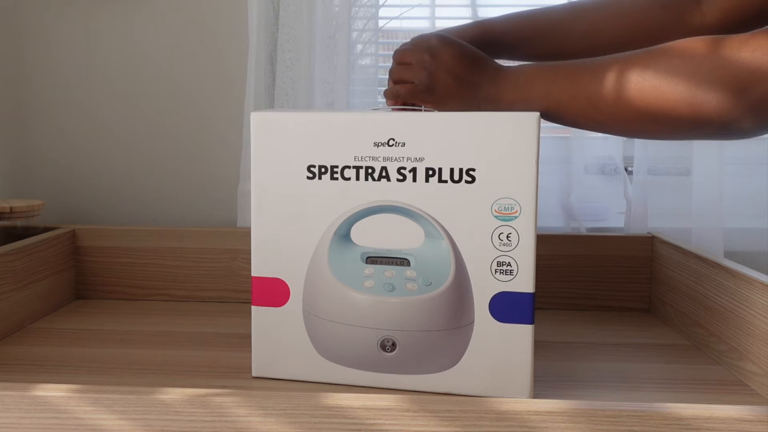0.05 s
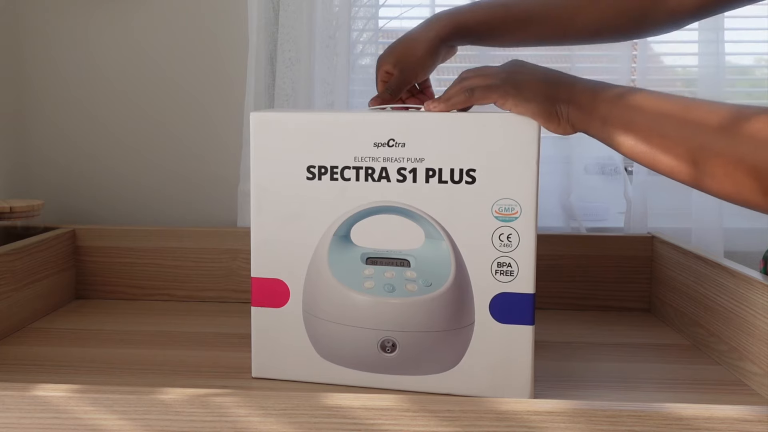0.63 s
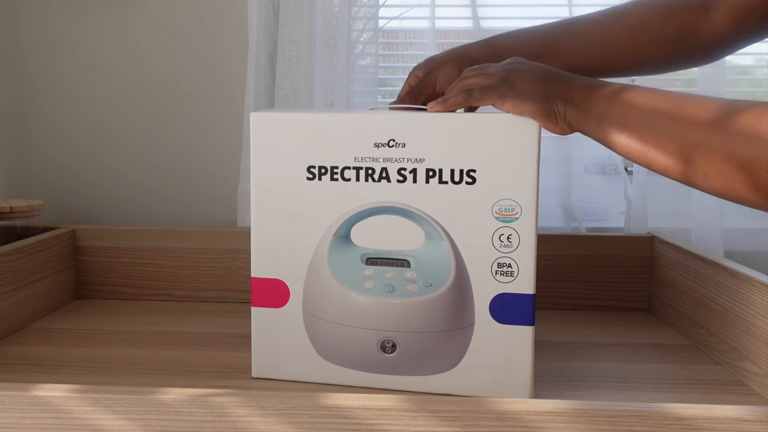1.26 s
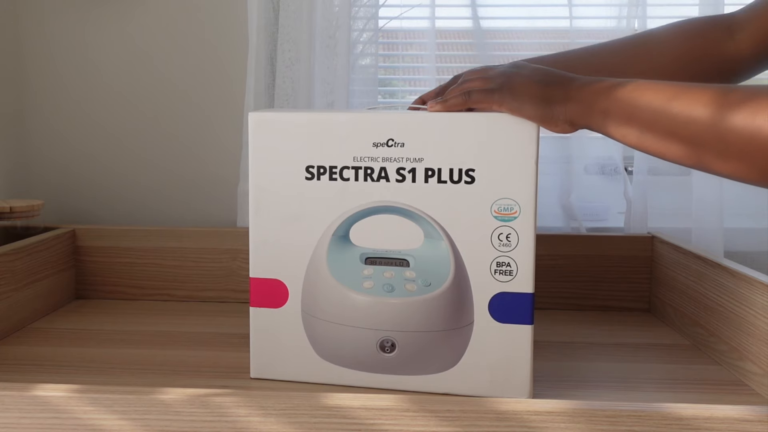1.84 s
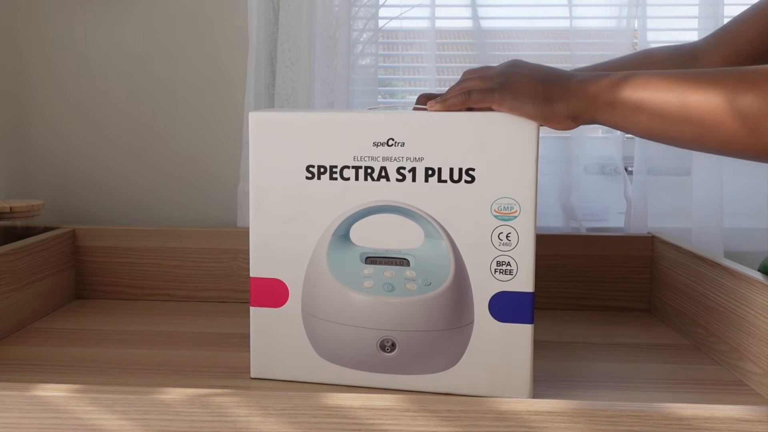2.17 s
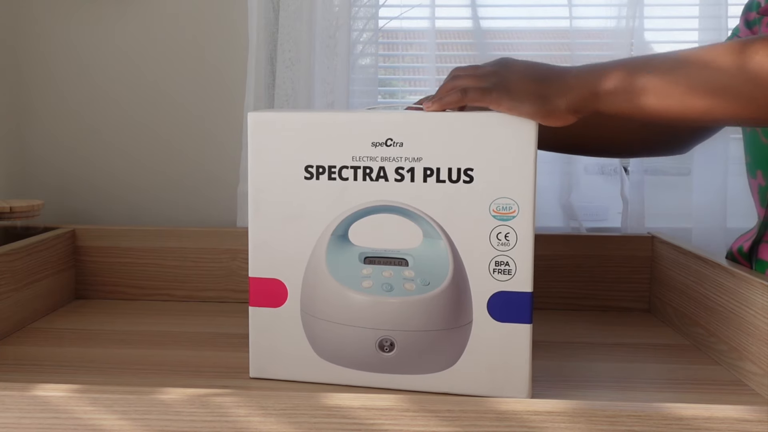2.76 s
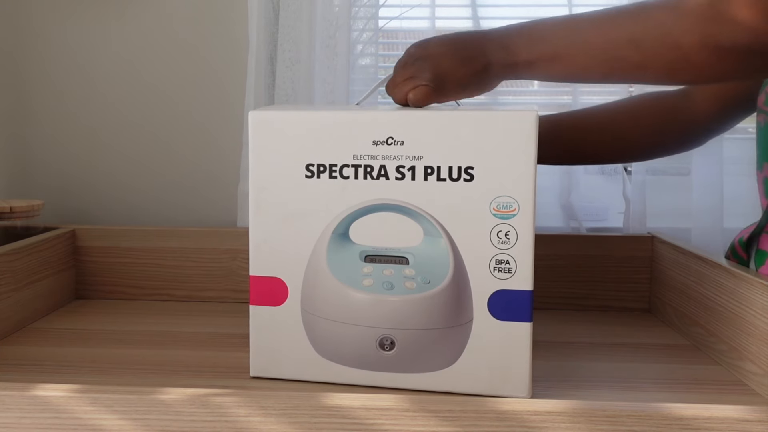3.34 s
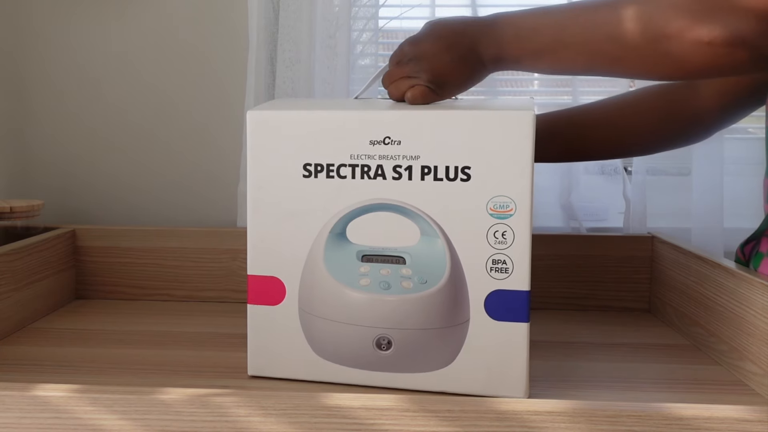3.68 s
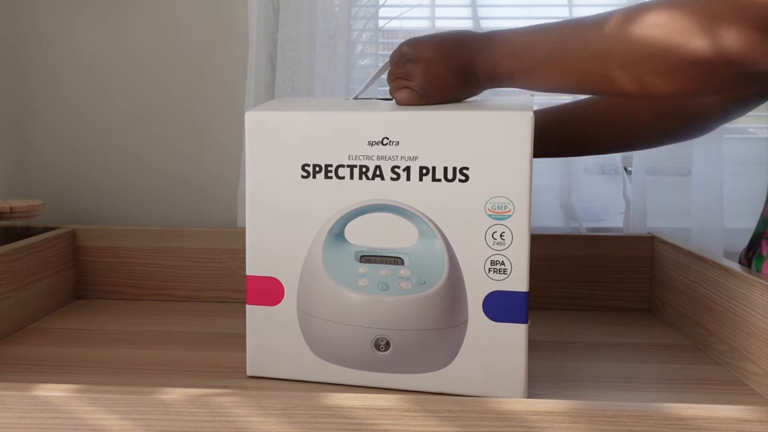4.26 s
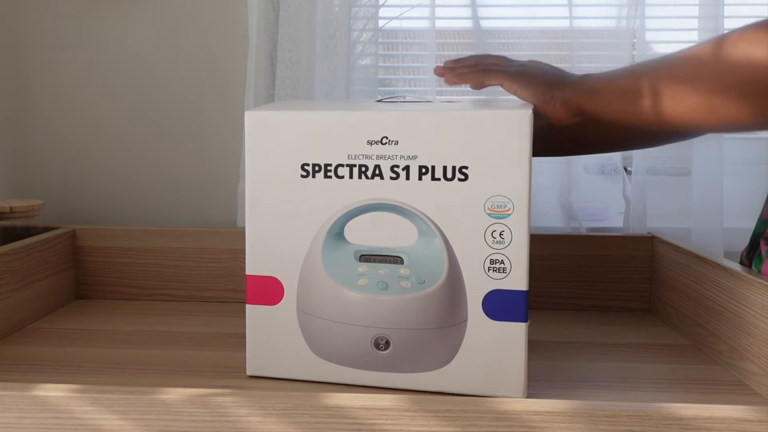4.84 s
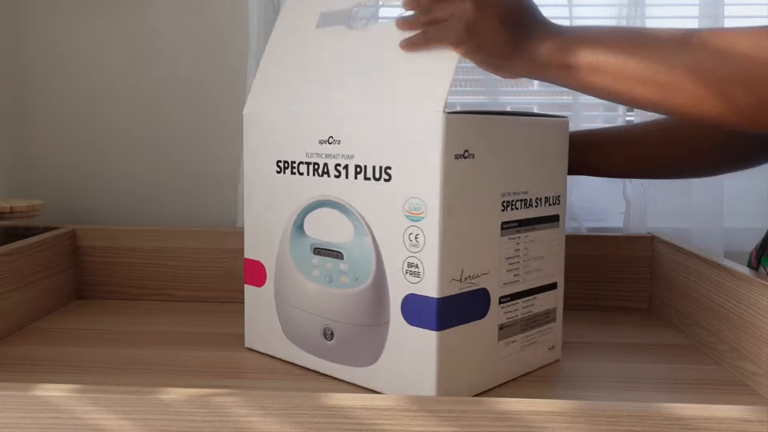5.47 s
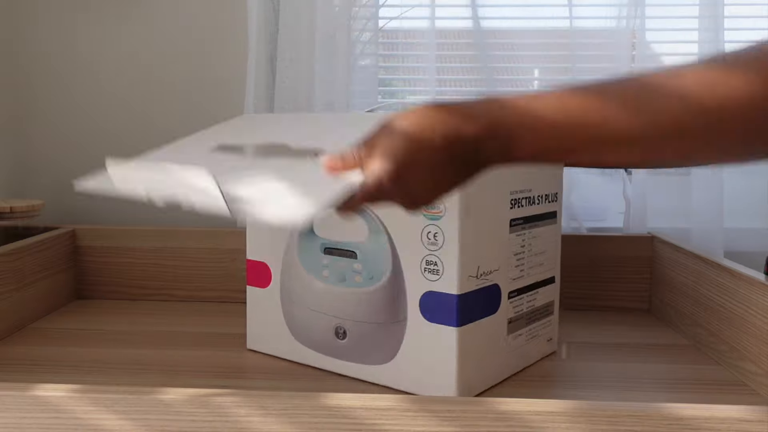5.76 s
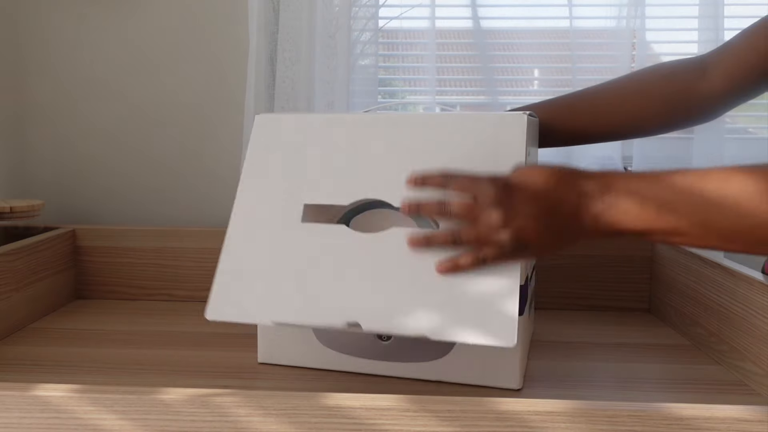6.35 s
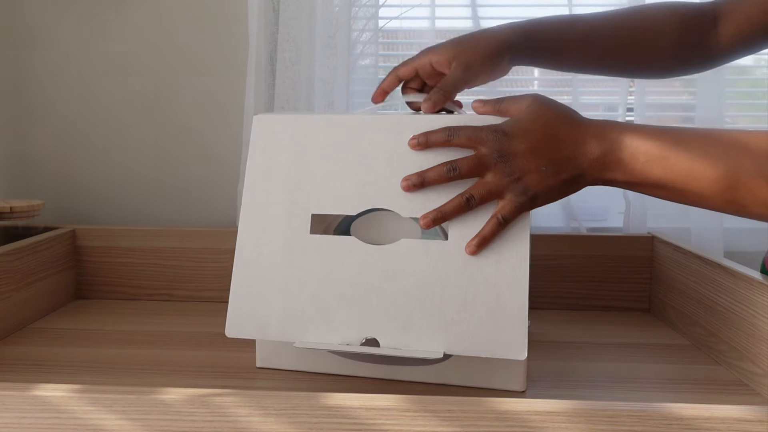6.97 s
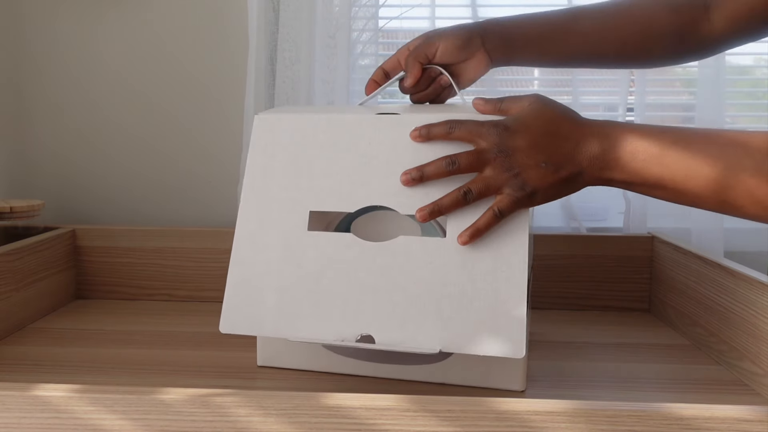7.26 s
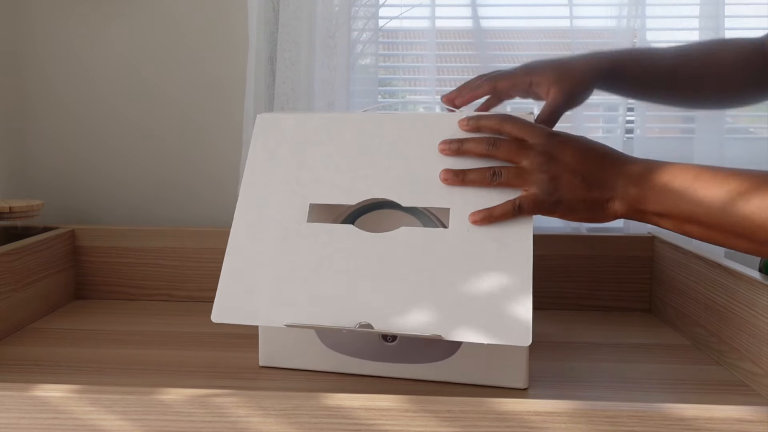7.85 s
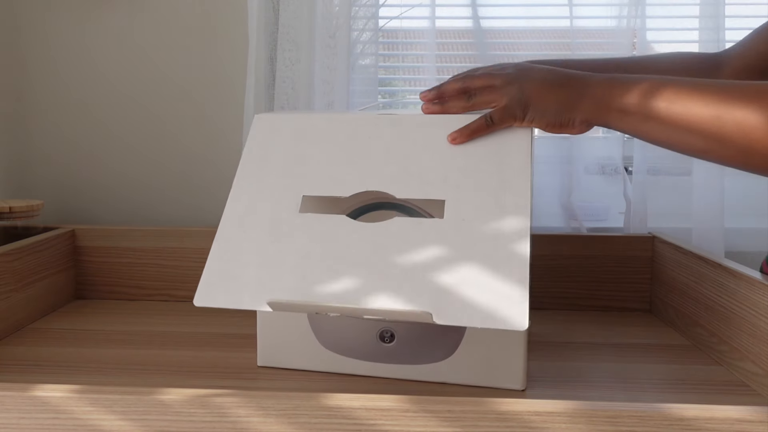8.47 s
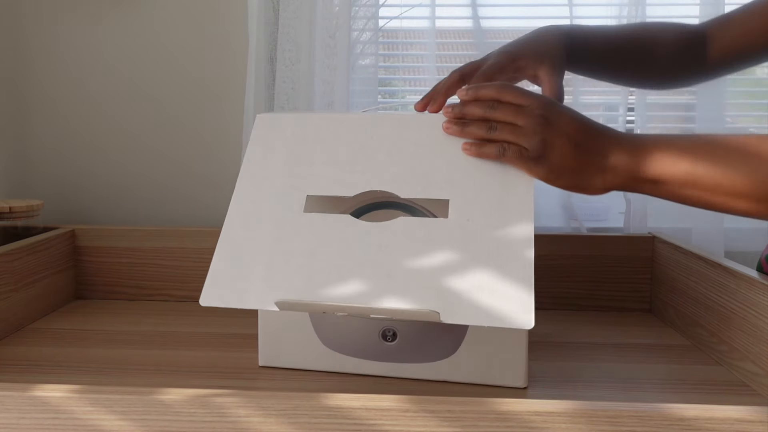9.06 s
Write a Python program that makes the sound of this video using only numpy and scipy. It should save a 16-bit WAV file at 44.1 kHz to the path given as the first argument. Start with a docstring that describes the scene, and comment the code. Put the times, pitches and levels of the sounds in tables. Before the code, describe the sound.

A cardboard box is opened by hand close by, with dry scrapes, sharp cracks, one short squawk and hollow taps.

```python
"""A large cardboard box opened by hand on a wooden table, a metre from a phone in a small quiet room.
Fingers rub and pick at the board, a tight tab sticks and slips out of its slot with a squawk and the
carry handle flicks free; the lid scrapes open, flops over and is patted down. Blows and rubbing ring
the panels and the hollow inside, creases crack, and near walls answer over a faint steady hush."""
import sys
import numpy as np
from scipy import signal
from scipy.fft import rfft, irfft, next_fast_len
from scipy.io import wavfile
from scipy.ndimage import uniform_filter1d

SR = 44100
rng = np.random.default_rng(int(sys.argv[2]) if len(sys.argv) > 2 else 0)


def digitize_waveform(pressure):
    """Quantize a signal to 16-bit integers and store it at the path in sys.argv[1].

    Rows of a 2-D input are taken as channels; values are limited to [-1, 1].
    """
    field = np.atleast_2d(pressure).T
    bounded = np.clip(field, -1, 1)
    quanta = np.round(bounded * 32767).astype(np.int16)
    wavfile.write(sys.argv[1], SR, quanta)


N = 402191
TIME = np.arange(N) / SR

# The modes of the box. Each row: pitch in Hz, relative level in dB, t60 in seconds before added damping.
BOX_MODES = [(203, -6, 0.29), (240, -2.5, 0.3), (285, -3, 0.085), (368, 4, 0.27), (445, -3, 0.1),
             (595, 5.5, 0.15), (690, -4, 0.08), (950, -1, 0.16), (1115, 3.5, 0.13), (1178, 4.5, 0.13),
             (1695, 3, 0.12), (1810, 1, 0.12), (2460, 3, 0.013), (2900, 2, 0.099), (3810, 4.5, 0.24)]


def knocks(crumple=0.93, table_db=-35, body_width_hz=170):
    """Each blow is a scuff, a sharp contact and a crumple of tiny slips while the board settles."""
    # Each row: contact in seconds; levels in dB of hollow body, panels, crack and sizzle of the cut
    # edges; body pitch in Hz; time constants of scuff and settling in seconds.
    blows = [(0.046, -62, -63, -75.5, -84, 316, 0.0062, 0.017),
             (.175, -62, -75, -79, -82, 333, 0.0011, 0.012), (0.426, -65, -83, -90, -105, 209, 0.027, .018),
             (.846, -62, -71, -76, -94, 241, .0037, 0.0082),
             (1.141, -63, -66.5, -59.5, -74, 283, 0.00093, 0.021),
             (1.391, -65.5, -66, -82, -88, 270, .013, .0066),
             (1.494, -63.5, -67.5, -87, -91, 327, .0035, .008),
             (1.751, -64, -64, -75, -77, 260, 0.0034, 0.033),
             (1.825, -68, -64.5, -64.5, -77, 370, 0.0055, 0.0097),
             (2.171, -67, -58.5, -75, -78, 341, 0.0078, 0.018),
             (2.203, -65, -45, -51, -51, 390, 0.0022, 0.043),
             (2.259, -43, -36, -34.5, -59, 300, 0.0044, 0.016),
             (2.319, -28.5, -36, -43.5, -66.5, 250.7, 0.0042, 0.011),
             (2.596, -54.5, -65, -69, -81, 202, 0.0058, 0.045),
             (2.773, -55, -58, -55, -66, 207, 0.0082, 0.057),
             (2.909, -56.5, -59.5, -61, -62, 407, .001, 0.006),
             (3.018, -54, -54, -72, -86, 326, 0.0011, 0.0042),
             (3.136, -54, -59, -84, -86, 298, .0005, 0.005), (3.162, -54, -62, -72, -75, 278, 0.02, 0.0078),
             (3.273, -44, -52, -62, -74, 316, 0.0065, 0.0084),
             (3.286, -38, -47.5, -53, -62.5, 340, 0.0048, 0.026),
             (4.049, -60.5, -69, -69, -81, 310, 0.0012, .011),
             (4.619, -61.5, -82, -90, -102, 343, 0.00045, 0.0098),
             (4.727, -41.5, -42.5, -45.5, -57, 340, 0.0028, 0.021),
             (4.790, -43, -48, -55, -66, 342, .004, .008),
             (4.806, -38.5, -38, -43.5, -65.5, 273, 0.0021, 0.013),
             (4.957, -47, -56, -54, -62.5, 294, 0.023, 0.026),
             (4.977, -41, -44.5, -51.5, -60.5, 290, 0.012, .018),
             (5.22, -42.5, -42.5, -36.5, -49.5, 355, 0.0032, 0.029),
             (5.281, -38, -38.5, -48, -64, 360, 0.0074, 0.022),
             (5.664, -60, -60, -69, -72, 450, 0.014, 0.0051),
             (5.718, -40.5, -39.5, -39.5, -50.5, 357, 0.0093, 0.016),
             (5.77, -52.5, -70, -66, -60, 430, 0.0078, 0.013),
             (6.028, -58.5, -58.5, -52, -63, 267, 0.0087, 0.028),
             (6.249, -58.5, -60, -57, -80, 289, 0.0038, .022),
             (6.371, -59.5, -59, -76, -88, 260, 0.0076, 0.011),
             (6.559, -55, -62, -72, -76, 273, 0.0028, 0.0064),
             (6.594, -53, -65, -58, -75, 299, 0.0036, .016),
             (6.916, -34.5, -42, -50, -64, 245, 0.00055, .015),
             (6.938, -39, -50, -57, -68, 224, .001, 0.0078), (6.985, -45, -50, -61, -72, 330, .002, .009),
             (7.081, -46, -49, -52, -71, 336, 0.029, 0.022),
             (7.2246, -50.5, -46.5, -59, -79, 272, 0.00085, 0.014),
             (7.493, -52, -48, -74, -80, 285, 0.00089, 0.0043),
             (7.579, -57, -57, -72, -78, 328, 0.0013, .006),
             (7.630, -45.5, -56, -63, -80, 268, 0.002, .009),
             (7.679, -47.5, -58, -80, -92, 346, .001, 0.0039),
             (7.745, -34, -36.5, -44.5, -60, 395, 0.0045, 0.022),
             (7.783, -45, -46.5, -53, -68, 410, .002, .01), (7.874, -51, -56, -66, -86, 355, 0.026, 0.01),
             (8.401, -55, -58.5, -73, -72, 316, 0.094, 0.022),
             (8.776, -53.5, -53.5, -53.5, -69, 257, 0.0028, .022),
             (9.016, -47, -49.5, -55, -70, 297, 0.0018, 0.013),
             (9.084, -50, -56, -66, -80, 337, 0.0021, 0.028)]
    edges_hz = [135, 480, 2000, 6000, 14000]  # band edges of body, panels, crack and sizzle
    body_band, *upper_bands = zip(edges_hz, edges_hz[1:])
    centres_hz = np.sqrt(np.prod(upper_bands, axis=1))
    out, lead = np.zeros(N), SR // 10
    t = np.arange(-lead, SR * 3 // 10) / SR
    for s, body_db, *upper_db, body_hz, scuff_s, settle_s in blows:
        pressure = np.exp(-np.abs(t) / np.where(t < 0, scuff_s, settle_s))
        force = slips(len(t), rate=3500, spread_db=2.0) * pressure
        force *= crumple * np.sqrt(settle_s / 0.0056) / np.linalg.norm(force)
        force[lead] += 1  # the sharp contact
        ring = signal.fftconvolve(even(force), box_ring())[:len(t)]
        ring = band(ring, 130, 2700, order=1)  # small panels radiate little bass; board swallows treble
        # a wide panel booms lower and more clearly pitched than a corner
        hollow = resonate(band(ring, *body_band, order=4), body_hz, body_width_hz)
        walls = wall_boom(t, body_hz)
        wall_share = np.clip(.75 * (1 - (body_hz - 235) / 220), 0, .95)
        boom = sum(np.sqrt(share) * x * undb(body_db - attack_db(x, lead))
                   for share, x in [(wall_share, walls), (1 - wall_share, hollow)])
        # a soft palm leaves the panels dull, a stiff edge makes them crack
        gains_db = np.array(upper_db) - [attack_db(band(ring, lo, hi), lead) for lo, hi in upper_bands]
        panels = band(colour(ring, list(zip(centres_hz, gains_db))), 410, 14300, order=2)
        add(out, s + t[0], boom + panels)
    # the table takes up a little of each thump as a low shudder
    thump = np.sqrt(np.abs(uniform_filter1d(band(out, 99.6, 370) ** 2, SR // 50)))
    shudder = unit(band(rng.standard_normal(N), 25.3, 120, order=2))
    return out + undb(table_db) * thump * shudder


def box_ring(panel_t60=0.033, panel_db=3, spot_db=3, hand_t60=0.8, loss_hz=400):
    """The box struck at a random spot: modes shifted and damped by the grip, over a dense panel ring."""
    t = np.arange(SR // 4) / SR
    hz, db, t60 = np.transpose(BOX_MODES)[:, :, None]
    spot, grip, side = rng.standard_normal((3, len(BOX_MODES), 1))
    hz = hz * (1 + .015 * grip)
    damping = 1 / t60 + (1 + hz / loss_hz) / hand_t60  # the board damps high modes fastest
    fade = np.exp(-np.log(1000) * t * damping)
    modes = np.sign(side) * undb(db + spot_db * spot) * np.sin(2 * np.pi * hz * t) * fade
    panels = even(rng.standard_normal(len(t)) * np.exp(-np.log(1000) * t / panel_t60))
    return modes.mean(0) + undb(panel_db) * panels


def wall_boom(t, hz, wall_t60=0.12, wall_hz=240, swell_s=0.0032, pair_db=-9, bend=.14, bend_s=.025):
    """Two broad walls flex against the air inside: close low modes that sag as the board relaxes."""
    t = np.maximum(t, 0)
    detune, phase = rng.standard_normal(2)
    angle = 2 * np.pi * hz * (t + bend * (bend_s * (1 - np.exp(-t / bend_s)) - t / 2))
    pair_ratio = .85 * (1 + .03 * detune)
    pair = np.sin(angle) + undb(pair_db) * np.sin(pair_ratio * angle + phase)
    swell = 1 - np.exp(-t / swell_s)
    fade = np.exp(-np.log(1000) * t / wall_t60 * (hz / wall_hz) ** 2)  # higher pairs die sooner
    return band(pair * swell * fade, 135, 1200, order=2)


def tab_squawk(tearing=.55, direct=0.067, tab_db=-2, jitter=.05):
    """The tab sticks and slips in a rising squawk that drops as it lets go; its flap colours it."""
    # The pull out of the slot. Each row: time in seconds, slips per second, relative level in dB.
    tab_pull = [(2.218, 760, -65), (2.227, 810, -29.5), (2.234, 860, -21.5), (2.24, 910, -19),
                (2.249, 950, -17.5), (2.253, 750, -24.5), (2.262, 570, -32.5), (2.275, 1050, -67)]
    # Resonances of tab and flap. Each row: centre in Hz, width in Hz, relative gain in dB.
    flap_modes = [(710, 44, -8), (960, 200, 1.5), (1110, 61, -1), (1505, 90, 2), (1740, 260, -5.5),
                  (2260, 110, -7), (2600, 92, 4.5), (2930, 100, -8), (3500, 260, -9.5), (4260, 400, -18),
                  (5640, 500, -18)]
    rate, db = curves(tab_pull)
    wobble = jitter * unit(uniform_filter1d(rng.standard_normal(N), SR // 700))
    slip_count = np.floor(np.cumsum(rate * (1 + wobble)) / SR)
    pulses = np.diff(slip_count, prepend=0)
    pull = undb(db) * ((TIME > tab_pull[0][0]) & (TIME < tab_pull[-1][0]))
    drive = (unit(pulses) + tearing * slips(N, rate=5200, spread_db=-3)) * pull
    flap = sum(undb(gain_db) * resonate(drive, hz, width) for hz, width, gain_db in flap_modes)
    squawk = unit(band(direct * drive + flap, 480, 4600))
    return squawk * np.sqrt(np.mean(pull ** 2)) * undb(tab_db)


def snaps(snap_t60=0.022, low_hz=600, soft_hz=4000):
    """A crease gives way or a nail catches an edge: one dry crack, too brief to ring the box."""
    # Each row: start in seconds, attack level in dB, treble cutoff in Hz.
    cracks = [(.177, -63, 14000), (1.141, -56, 9000), (2.3135, -35, 14000), (2.3235, -31.5, 11000),
              (2.329, -32.5, 12000), (2.802, -43.5, 11000), (4.797, -47.5, 6000), (4.807, -43, 4270),
              (5.2195, -42, 13900), (5.2815, -35, 3500), (5.292, -40, 3200), (5.718, -33, 13000),
              (5.7255, -34, 12000), (6.558, -51, 3000), (6.5675, -50, 2600), (6.594, -49, 5030),
              (6.916, -57, 14000), (7.079, -43.5, 14000), (7.093, -43, 13000), (7.225, -46, 2970),
              (7.494, -46, 1780), (8.776, -50.5, 5000)]
    out, t = np.zeros(N), np.arange(SR // 20) / SR
    for s, db, top_hz in cracks:
        burst = even(rng.standard_normal(len(t)) * np.exp(-np.log(1000) * t / snap_t60))
        softened = band(burst, low_hz, soft_hz, order=1)
        crack = band(softened, 250, top_hz, order=4)
        add(out, s, undb(db) * crack / np.std(crack[:SR // 300]))
    return out


def rubbing(judder_db=0.5, ring_db=-6.5, grit_db=-13, fumble_db=3, waver_db=1, shift_db=4, scrape_db=-1):
    """Skin and card slide in uneven steps; dense slips and coarse catches hiss and ring the box."""
    # The tone of sliding card. Each row: frequency in Hz, relative level in dB.
    spectrum = [(60, -2.5), (130, -11.5), (250, -1), (600, -7.5), (1400, -5), (2200, -3), (3700, -3.5),
                (5500, -9.5), (8500, -12.5), (15500, -22)]
    edges_hz = [100, 500, 5000, 15500]  # band edges of rumble, scrape and hiss
    fibres = slips(N, rate=14000, spread_db=-0.7)
    grit = slips(N, rate=160, spread_db=0.5)
    friction = (fibres + undb(grit_db) * grit) * undb(judder_db * walk(70) + waver_db * walk(14))
    # the modes come and go as the contact moves
    ringing = sum(undb(db + shift_db * walk(9)) * resonate(friction, hz, 9 / t60)
                  for hz, db, t60 in BOX_MODES)
    sound = colour(friction + undb(ring_db) * ringing, spectrum)
    rumble, scrape, hiss = stroke_levels()
    levels = [rumble * undb(fumble_db * walk(35)), scrape * undb(scrape_db), hiss]
    return sum(gain * unit(band(sound, lo, hi)) for gain, lo, hi in zip(levels, edges_hz, edges_hz[1:]))


def stroke_levels(release_s=0.047, sag_db_per_s=9):
    """Gains of rumble, scrape and hiss: each stroke gathers speed, slows a little and dies away."""
    # Fingers and flaps sliding over the board. Each row: start, length and rise in seconds,
    # scrape level in dB, then rumble and hiss in dB over the scrape.
    strokes = [(0.064, 0.044, 0.022, -85, 20.5, -15), (0.168, 0.11, .008, -76.5, -3, 7),
               (0.352, 0.2, 0.083, -65.5, -2, -2.5), (0.565, 0.11, 0.023, -69, -1.5, -2),
               (0.713, 0.22, 0.022, -73, 2, -8), (1.115, 0.15, 0.014, -76.5, 8, 2.5),
               (1.345, 0.052, 0.028, -64.5, -12, -6), (1.506, 0.077, 0.045, -69, 2, 0.5),
               (1.755, 0.087, .03, -75, -6, -3), (2.148, 0.051, 0.025, -61, -18, -1),
               (2.196, 0.057, 0.023, -40, -10.5, -5.5), (2.317, 0.0054, .004, -48.5, 2, 4.5),
               (2.46, 0.21, 0.083, -65, -15, -4), (2.598, 0.11, 0.03, -58, -6.5, -6),
               (2.787, 0.14, 0.015, -57, -4, 0.5), (2.947, 0.12, 0.023, -66.5, 1.5, -1),
               (3.172, 0.24, 0.027, -61.5, -1, -3), (3.422, 0.061, 0.06, -53.5, -17, -6),
               (3.522, 0.13, 0.018, -66, -9.5, -15), (3.67, 0.21, 0.22, -63, -2, -13),
               (3.89, .025, 0.016, -58.5, -7, -2), (3.948, 0.033, 0.023, -61.5, -1, -4),
               (4.058, 0.065, 0.053, -57.5, -2, -0.5), (4.164, 0.18, 0.028, -65.5, -4.5, -15),
               (4.546, 0.27, 0.017, -64, -11.5, -4.5), (4.66, 0.32, 0.068, -55.5, 0.5, -10.5),
               (4.923, 0.075, 0.039, -50, -9, -11), (5.105, 0.21, 0.17, -46.5, -9.5, -8.5),
               (5.333, .20, 0.079, -46.5, -15, -4), (5.592, 0.25, 0.12, -51.5, -10.5, -7),
               (5.845, 0.24, 0.078, -54.5, -13, -4.5), (6.094, 0.21, 0.032, -55, -10, -10.5),
               (6.371, 0.033, 0.041, -53, -10.5, -5.5), (6.42, 0.28, 0.035, -56.5, -7.5, -4),
               (6.922, 0.14, 0.029, -56, 5.5, -4), (7.076, 0.023, 0.014, -51, -11, -3),
               (7.189, 0.22, 0.21, -60.5, -9, -7.5), (7.473, 0.15, 0.07, -53, -1.5, -4),
               (7.63, 0.13, 0.016, -57.5, -16, -3.5), (7.78, 0.33, 0.019, -64, -8, -1),
               (8.034, 0.047, 0.045, -47.5, -6, -6), (8.12, 0.029, 0.055, -70, 12, -5),
               (8.208, 0.098, 0.032, -59.5, -1.5, 3), (8.31, 0.27, 0.022, -62.5, -8, -8.5),
               (8.667, 0.17, 0.063, -60.5, -7, -4), (8.838, .17, 0.033, -64.5, -13, -2),
               (9.01, 0.12, 0.018, -57, -8, -5.5)]
    resting_db = [-78, -76.5, -78.5]  # rumble, scrape and hiss of fingers that never quite stop
    power, t = np.zeros((3, N)), np.arange(SR) / SR
    for s, length_s, rise_s, db, rumble_db, hiss_db in strokes:
        attack = np.minimum(t / rise_s, 1)
        release = np.exp(-np.maximum(t - length_s, 0) / release_s)
        speed = attack * undb(db - sag_db_per_s * t) * release
        for layer, share_db in zip(power, (rumble_db, 0, hiss_db)):
            add(layer, s, (speed * undb(share_db)) ** 2)
    return np.sqrt(power + undb(resting_db)[:, None] ** 2)


def scratches(count=420, centre_hz=2200, spread_octaves=0.72, length_s=0.0078, db=-3.5, spread_db=2.5):
    """Sliding skin and nails catch at random: tiny pitched scratches that follow the strokes' level."""
    out, t = np.zeros(N), np.arange(SR // 25) / SR
    starts_s = rng.random(count) * TIME[-1]
    variations = np.clip(rng.standard_normal((count, 3)), -2, 2)
    for s, (pitch, length, size) in zip(starts_s, variations):
        hz = centre_hz * 2 ** (spread_octaves * pitch)
        age = t / (length_s * 2 ** (length / 2))
        swell = 2 * age * np.exp(1 - 2 * age)
        scratch = unit(resonate(rng.standard_normal(len(t)), hz, width_hz=0.16 * hz))
        add(out, s, undb(db + spread_db * size) * scratch * swell)
    _, scrape, _ = stroke_levels()
    return out * scrape


def squeaks(trim_db=0.5):
    """A quick flick of slips excites one narrow resonance of the handle or a card edge."""
    # Each row: peak time in seconds, pitch and width in Hz, relative level in dB, rise and fall in seconds.
    flicks = [(.55, 3700, 250, -75, 0.11, 0.21), (2.317, 3630, 810, -26.5, 0.0037, 0.0089),
              (2.331, 4040, 600, -33, 0.0049, 0.019), (2.8, 2450, 260, -38.5, .006, .011),
              (2.8, 2970, 450, -36, 0.008, 0.013), (2.801, 3700, 900, -36, 0.007, 0.013),
              (3.829, 3600, 420, -67, 0.033, 0.22), (4.076, 1550, 280, -59.5, 0.015, 0.014),
              (5.677, 522, 170, -45, 0.02, 0.014), (5.722, 6260, 1200, -39, 0.0027, 0.021),
              (5.83, 3470, 1400, -54, .006, .008), (5.965, 2780, 1500, -54, 0.0051, .008),
              (6.385, 1850, 1200, -51, 0.0087, 0.017), (6.405, 4340, 2200, -57, .008, .014),
              (6.559, 1640, 700, -45.5, 0.001, 0.0054), (6.648, 620, 250, -57, 0.0067, 0.0094),
              (7.385, 1020, 128, -56.5, 0.0066, 0.0082), (7.450, 2620, 400, -50, .001, 0.0037),
              (7.49, 2550, 250, -61.5, .06, 0.075), (8.56, 2210, 200, -68, 0.043, 0.051)]
    out, t = np.zeros(N), np.arange(-SR // 10, SR // 2) / SR
    for s, hz, width_hz, db, rise_s, fall_s in flicks:
        friction = slips(len(t), rate=6200, spread_db=0.0)
        tone = resonate(resonate(friction, hz, width_hz), hz, 2 * width_hz)
        swell = np.exp(-np.abs(t) / np.where(t < 0, rise_s, fall_s))
        add(out, s + t[0], undb(db + trim_db) * unit(tone * swell) * np.sqrt(np.mean(swell ** 2)))
    return out


def room(x, wet_db=0, width=0.1, build_s=0.0077, turn_hz=0.6058):
    """Near walls answer within milliseconds; the closely spaced microphones hear almost the same."""
    # Each row: lower and upper band edge in Hz, t60 in seconds, relative level in dB.
    decay_bands = [(57, 407, 0.28, -5.5), (456, 1980, 0.3, -3), (1940, 6200, 0.32, -9),
                   (5860, 14000, 0.19, -13)]
    t = np.arange(SR * 2 // 3) / SR
    tails = np.zeros((3, len(t)))
    for lo_hz, hi_hz, t60, db in decay_bands:
        fade = np.exp(-np.log(1000) * t / t60) * (1 - np.exp(-(t / build_s) ** 2))
        echoes = rng.standard_normal(tails.shape) * fade
        tails += undb(db + wet_db) * band(echoes, lo_hz, hi_hz) / np.linalg.norm(fade)
    one, other, side = (signal.fftconvolve(x, tail)[:N] for tail in tails)
    turn = 2 * np.pi * turn_hz * TIME + .5 * walk(2.058)  # moving arms and lid change the reflections
    side = band(side, 40, 5300, order=1)
    return x + np.cos(turn) * one + np.sin(turn) * other + width * np.array([side, -side])


def room_tone(db=-74):
    """The faint steady hush of the still room, wide across both microphones."""
    # Each row: frequency in Hz, relative level in dB.
    spectrum = [(25, -31.5), (60, -21), (110, 6.5), (200, 6), (320, 8.5), (520, 7), (1000, 5), (2000, -1),
                (3700, -22), (7000, -39.5), (15500, -37)]
    mid, side = (unit(colour(rng.standard_normal(N), spectrum)) for _ in range(2))
    return undb(db) * (mid + np.array([side, -side]))


def slips(count, rate, spread_db):
    """Paper fibres catch and let go: tiny random clicks of unequal size, about rate a second."""
    chance, size = rng.random(count), rng.standard_normal(count)
    spread = undb(spread_db * np.minimum(rng.exponential(size=count), np.log(100)))
    return unit((chance < rate / SR) * size * spread)


def even(x, passes=3):
    """Keep a burst's envelope but spread its energy over all pitches, as crowded, damped modes do."""
    def envelope(v):
        return np.sqrt(np.abs(uniform_filter1d(v ** 2, SR // 500)) + 1e-24)
    shape = envelope(x)
    for _ in range(passes):
        spectrum = rfft(x)
        x = irfft(spectrum / (np.abs(spectrum) + 1e-18), len(x))
        x = x * shape / envelope(x)
    return x


def walk(rate):
    """Random levels held 1 / rate seconds and smoothed, at rms 1."""
    steps = rng.standard_normal(4096)
    held = steps[(TIME * rate).astype(int) % len(steps)]
    return unit(uniform_filter1d(held, int(SR / rate)))


def curves(table):
    """Columns of a table led by time in seconds, as control curves over the scene."""
    s, *columns = np.transpose(table)
    return [np.interp(TIME, s, column) for column in columns]


def band(x, lo_hz, hi_hz, order=3):
    """Causal band-pass."""
    return signal.sosfilt(signal.butter(order, [lo_hz, hi_hz], "band", fs=SR, output="sos"), x)


def resonate(x, hz, width_hz):
    """One resonance, gain 1 at its centre."""
    return signal.lfilter(*signal.iirpeak(hz, hz / width_hz, fs=SR), x)


def colour(x, points):
    """Shape a sound with a spectrum of (Hz, dB) points."""
    hz, db = np.transpose(points)
    size = next_fast_len(len(x))
    bins_hz = np.maximum(np.arange(size // 2 + 1) * SR / size, 1)
    gains = undb(np.interp(np.log(bins_hz), np.log(hz), db))
    return irfft(rfft(x, size) * gains, size)[:len(x)]


def attack_db(x, start):
    """Level over the first 25 ms of a blow."""
    return 10 * np.log10(np.mean(x[start:start + SR // 40] ** 2))


def undb(db):
    """Decibels to gain."""
    return 10 ** (np.asarray(db) / 20)


def unit(x):
    """Scale to rms 1."""
    return x / np.sqrt(np.mean(x ** 2) + 1e-30)


def add(out, s, sound):
    """Mix a sound in from s seconds."""
    start = int(s * SR)
    lo, hi = max(start, 0), min(start + len(sound), N)
    out[lo:hi] += sound[lo - start:hi - start]


def pan(x, left_db):
    """Lean a stereo sound to the left by left_db."""
    return x * undb(np.array([[left_db], [-left_db]]) / 2)


def scene():
    """The box stands just right of centre; the tab's flap radiates left and at the phone, so is drier."""
    box = knocks() + snaps() + rubbing() + scratches() + squeaks()
    box = pan(room(box), left_db=-0.5)
    tab = pan(room(tab_squawk(), wet_db=-3), left_db=2.5)
    return box + tab + room_tone()


def record(dry):
    """The phone cuts the top steeply above 15.7 kHz."""
    return signal.sosfilt(signal.ellip(10, .2, 70, 15700, fs=SR, output="sos"), dry)


dry = scene()
out = record(dry)
digitize_waveform(out)
```